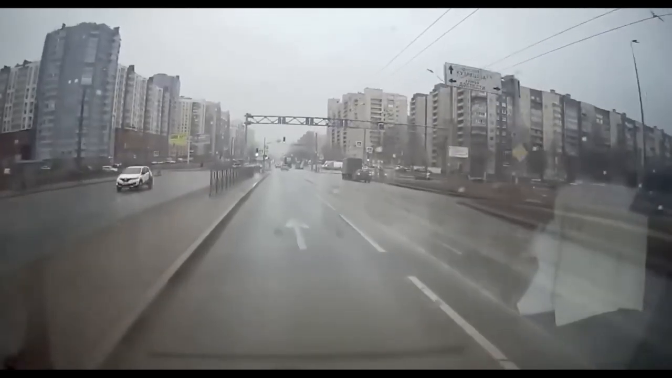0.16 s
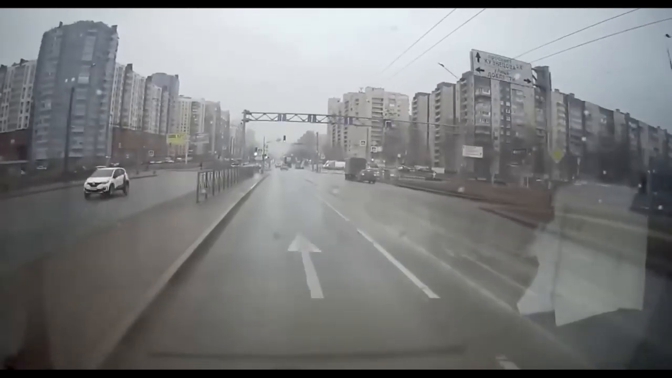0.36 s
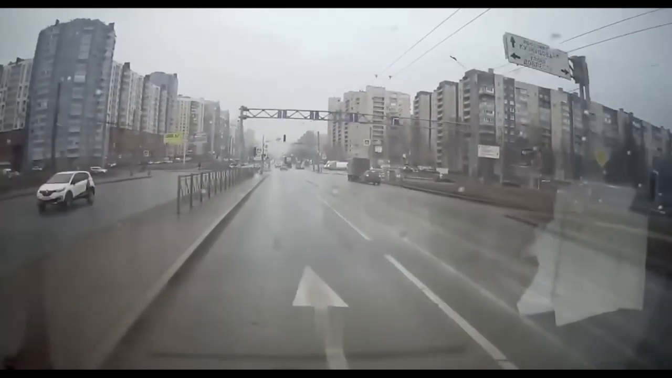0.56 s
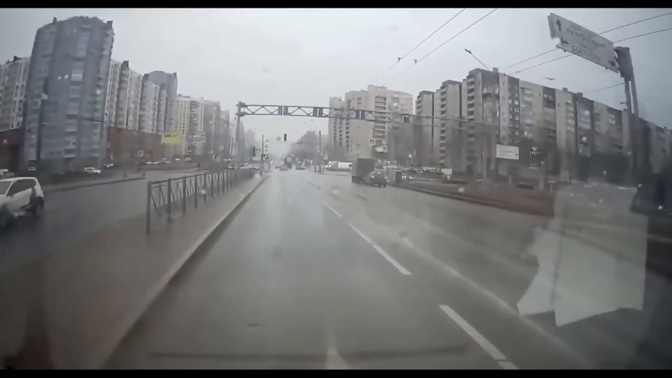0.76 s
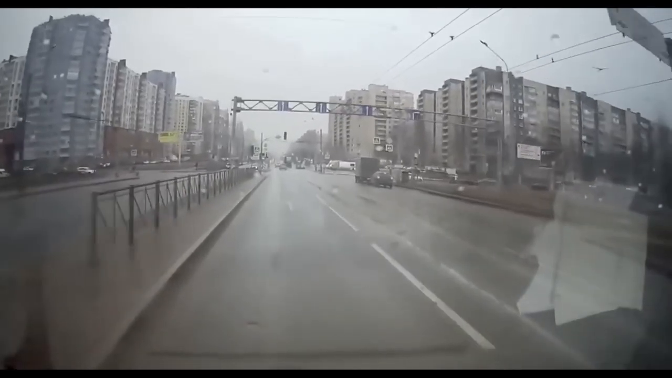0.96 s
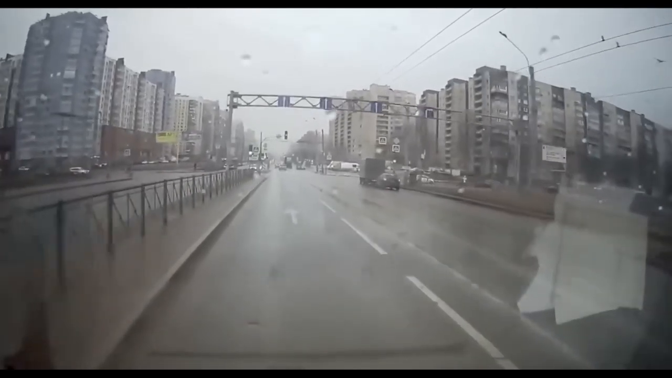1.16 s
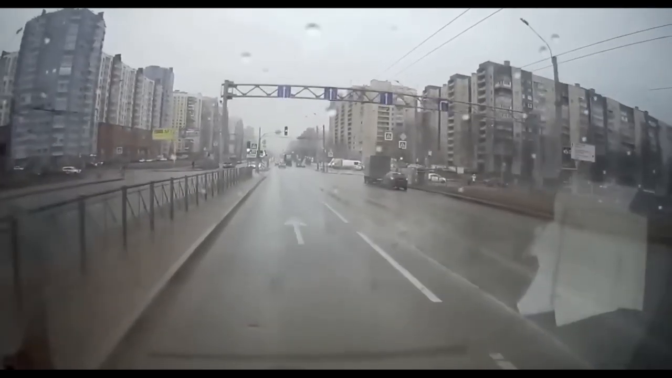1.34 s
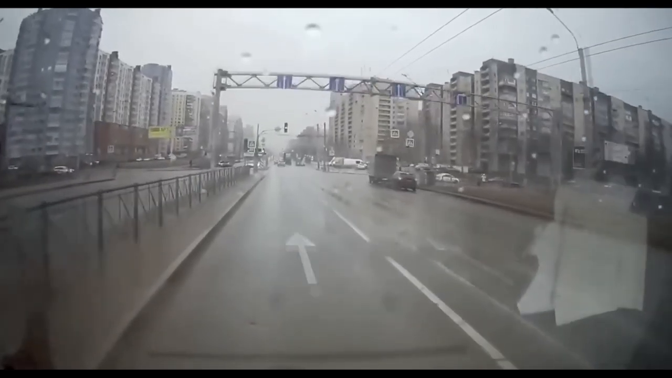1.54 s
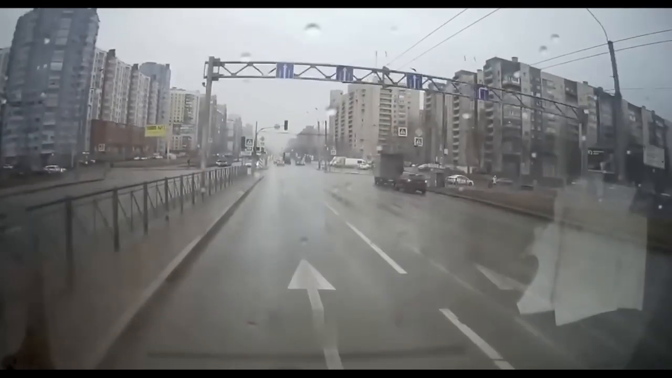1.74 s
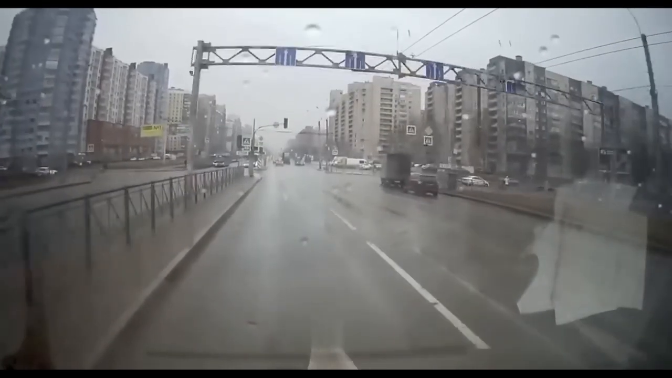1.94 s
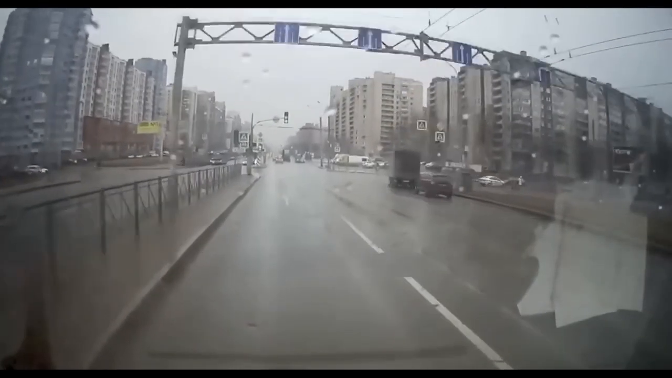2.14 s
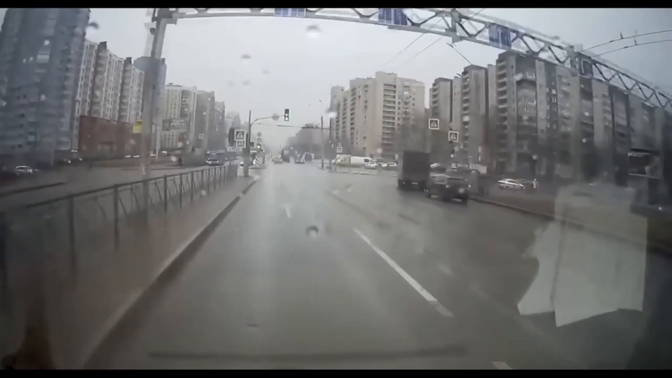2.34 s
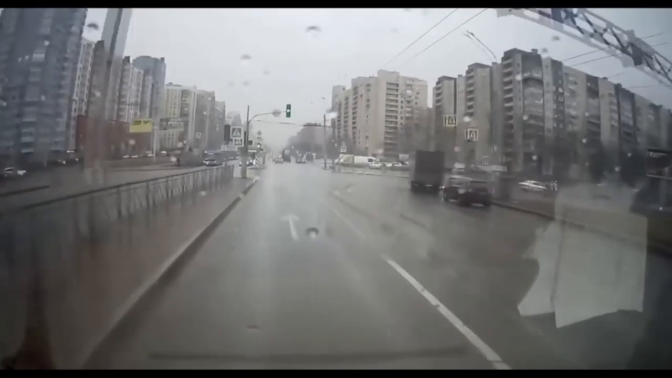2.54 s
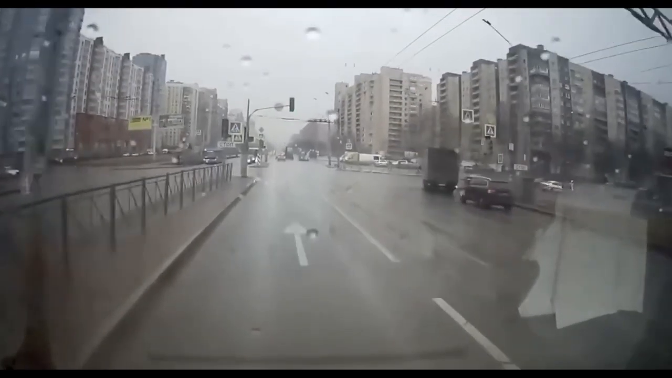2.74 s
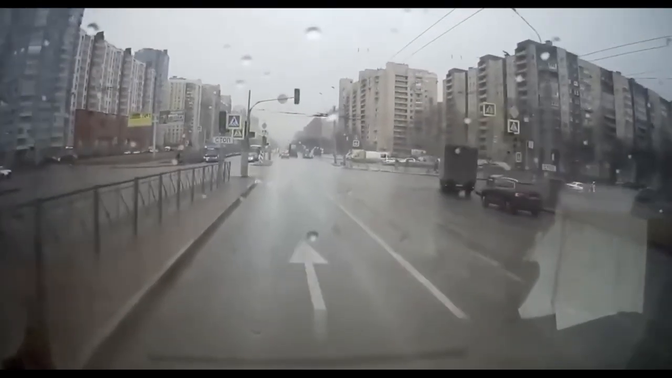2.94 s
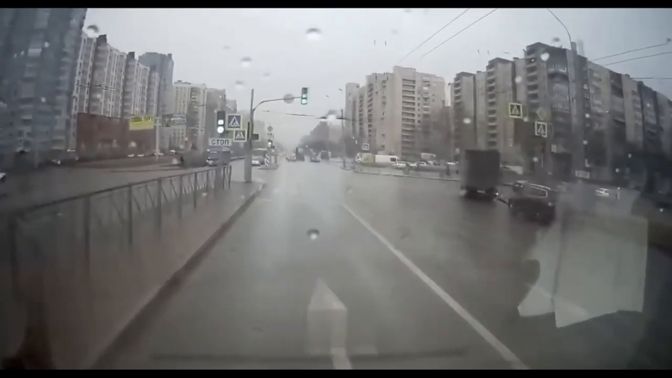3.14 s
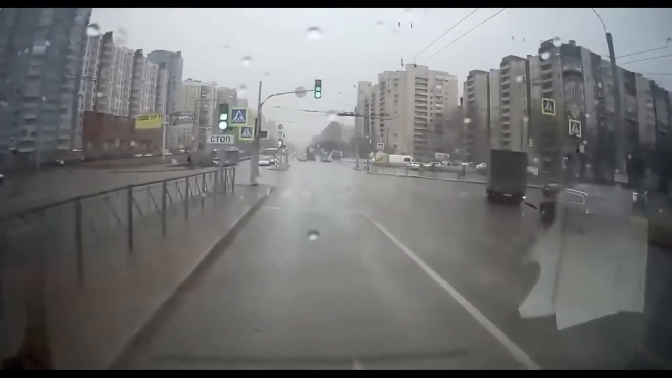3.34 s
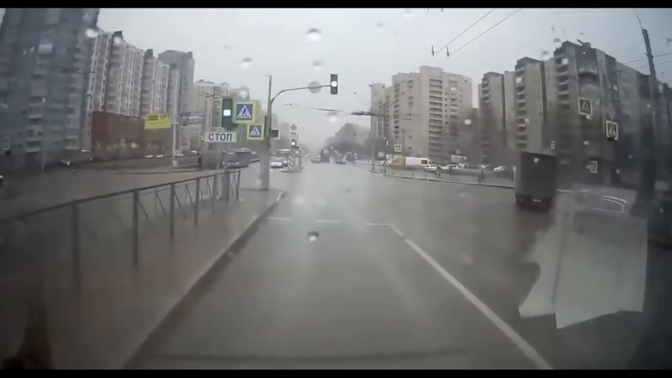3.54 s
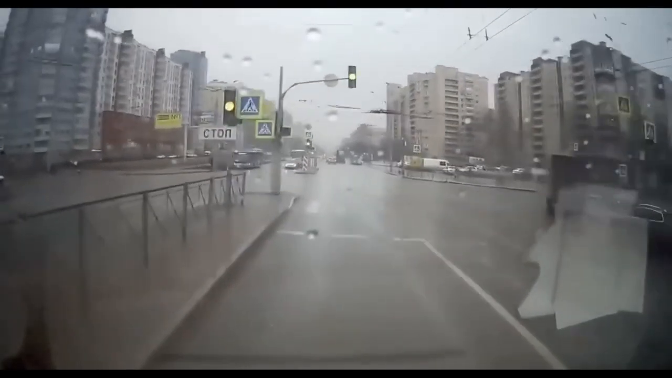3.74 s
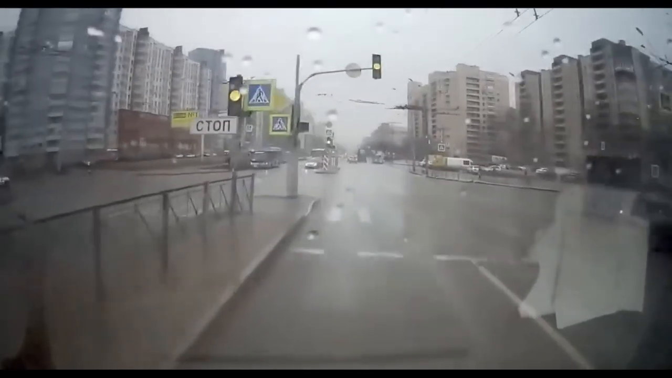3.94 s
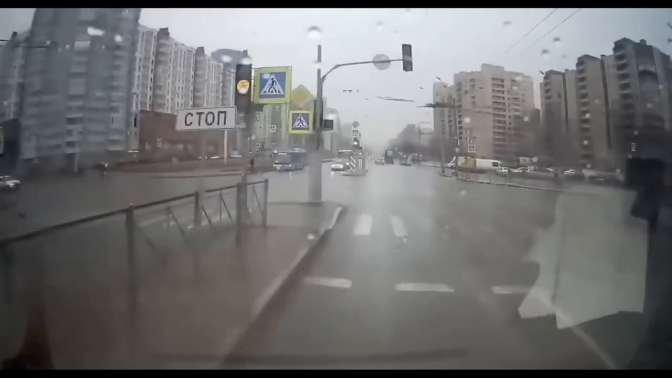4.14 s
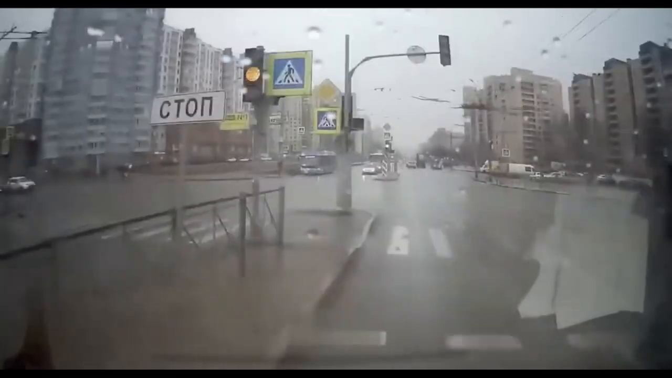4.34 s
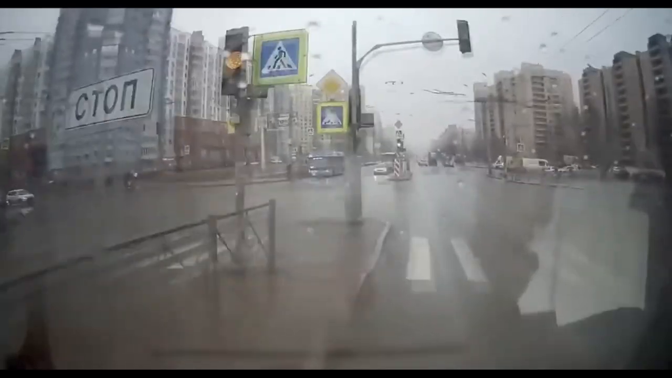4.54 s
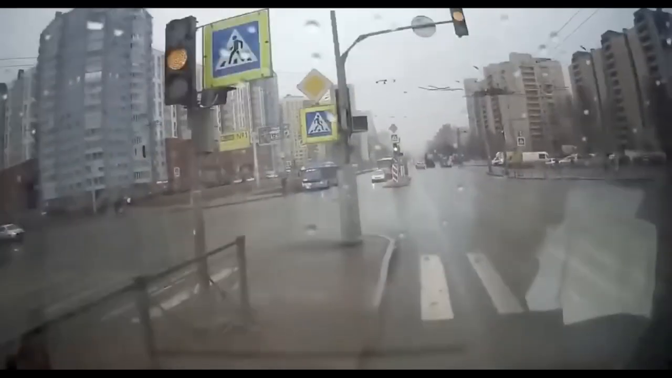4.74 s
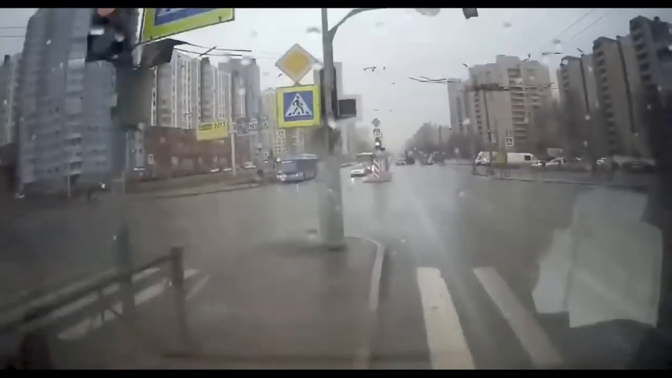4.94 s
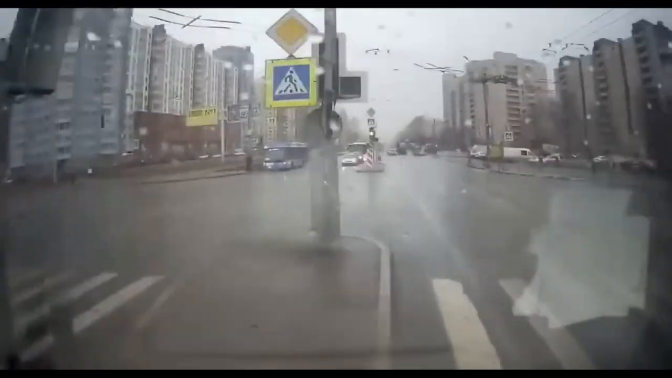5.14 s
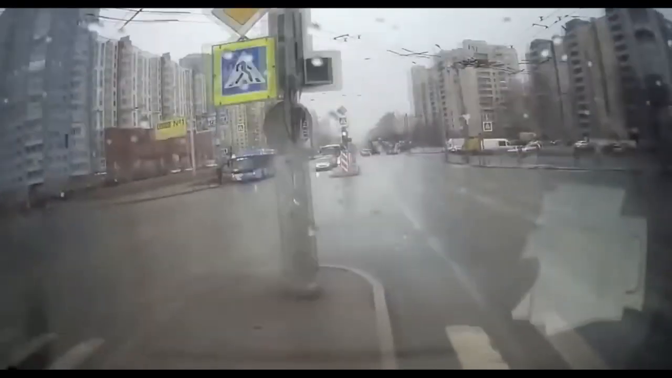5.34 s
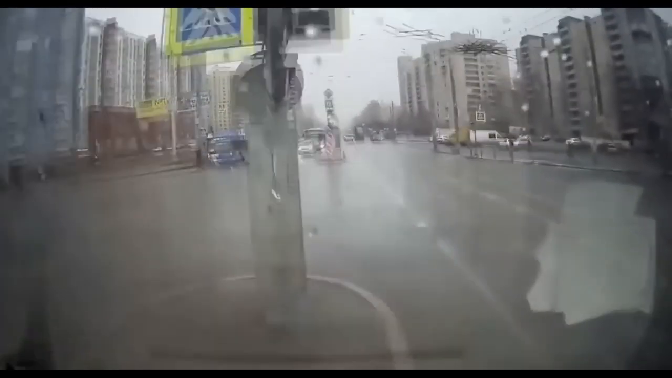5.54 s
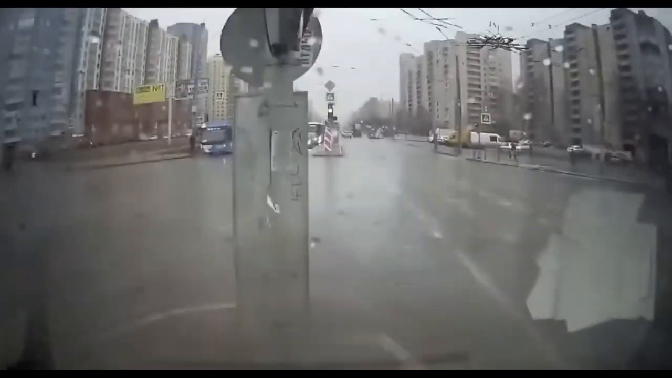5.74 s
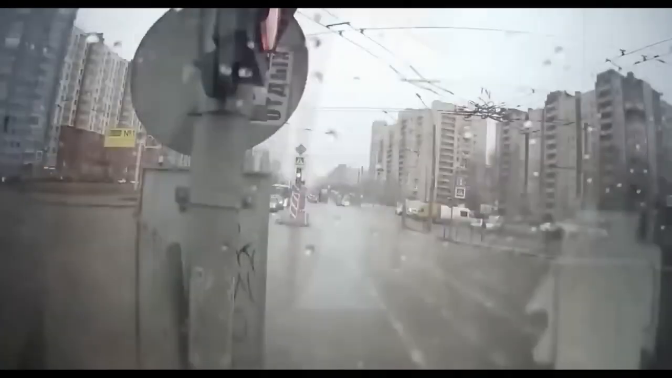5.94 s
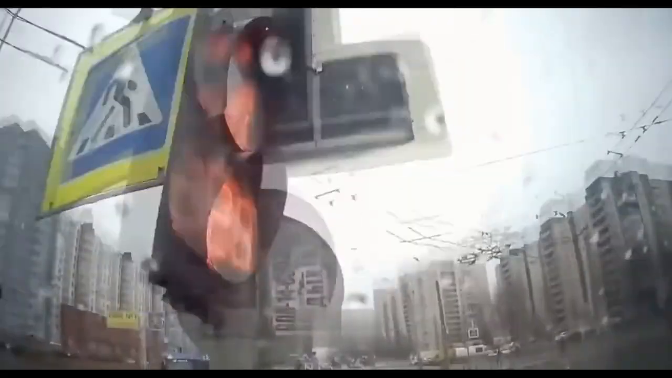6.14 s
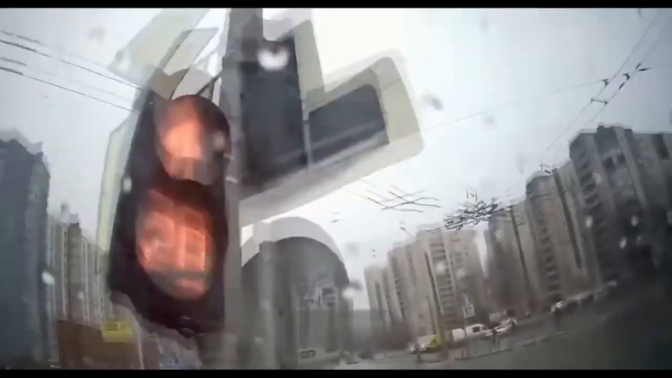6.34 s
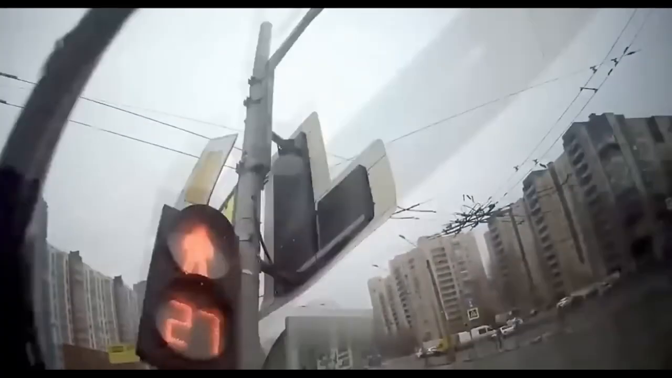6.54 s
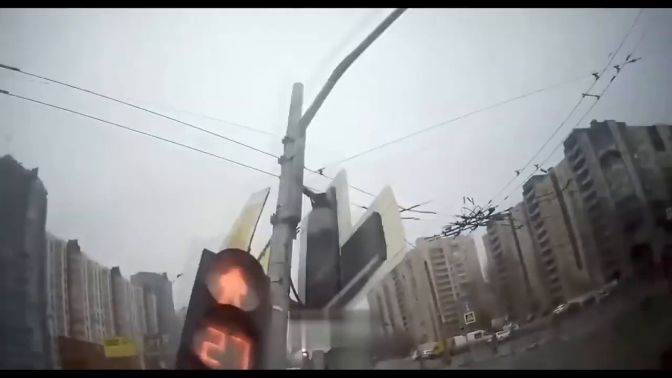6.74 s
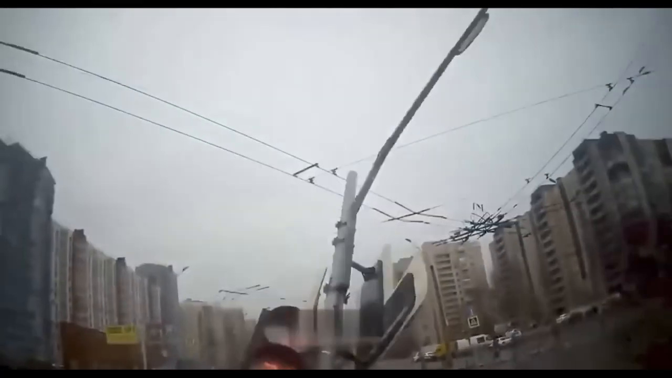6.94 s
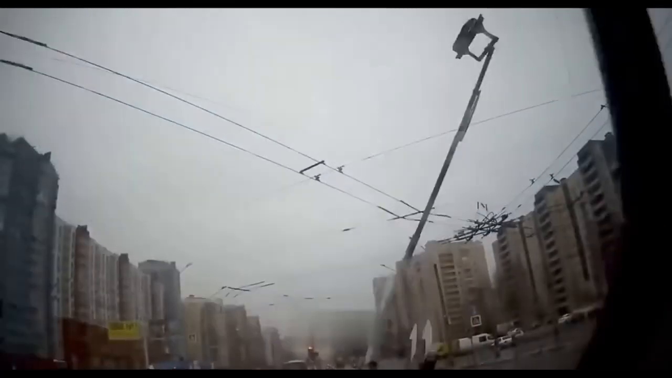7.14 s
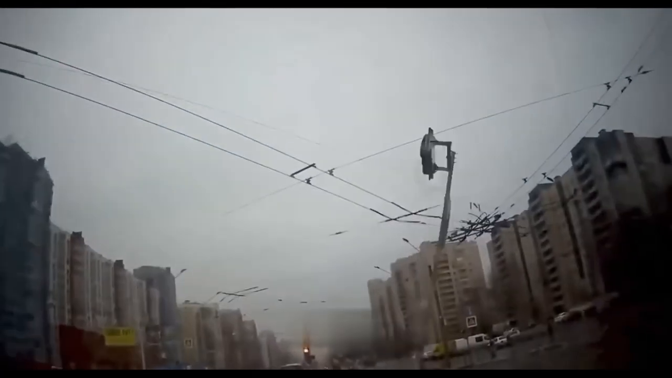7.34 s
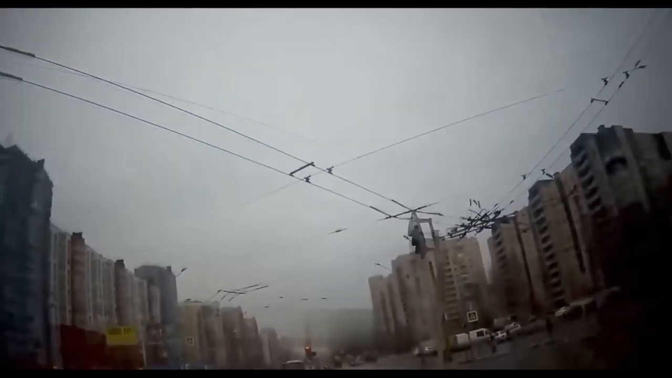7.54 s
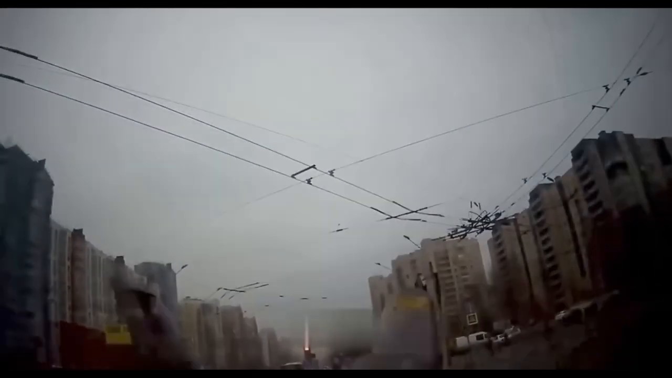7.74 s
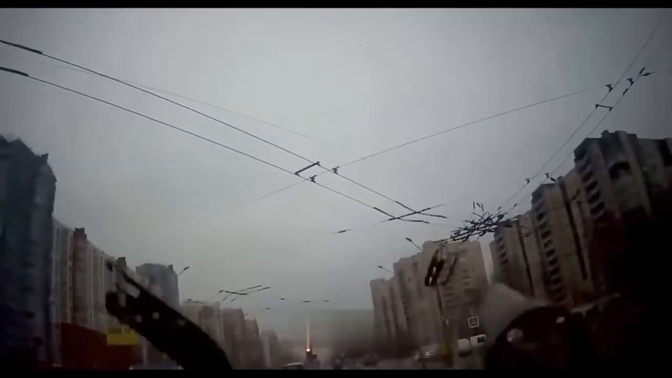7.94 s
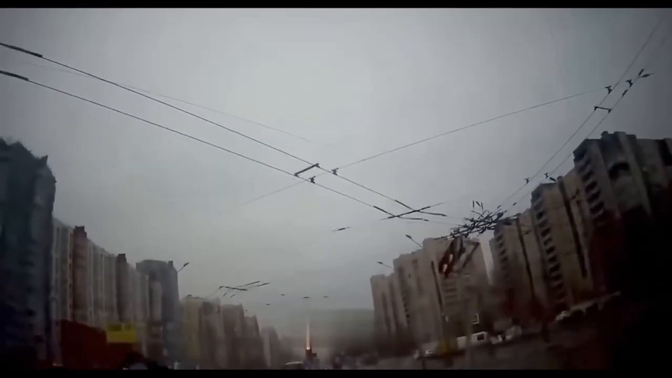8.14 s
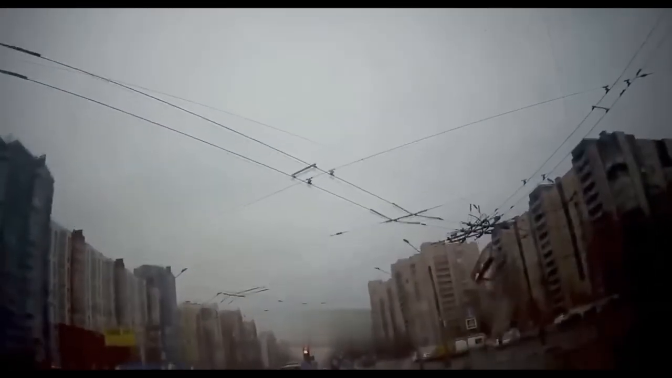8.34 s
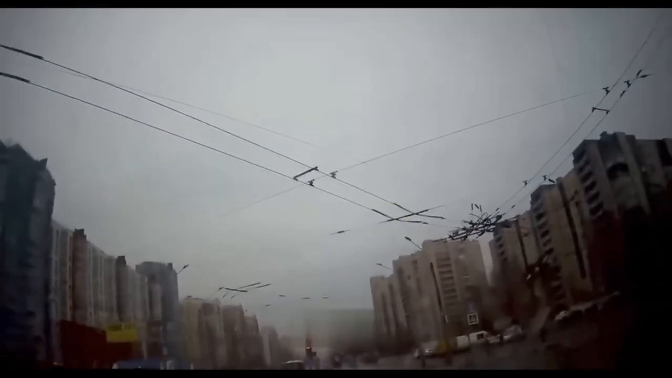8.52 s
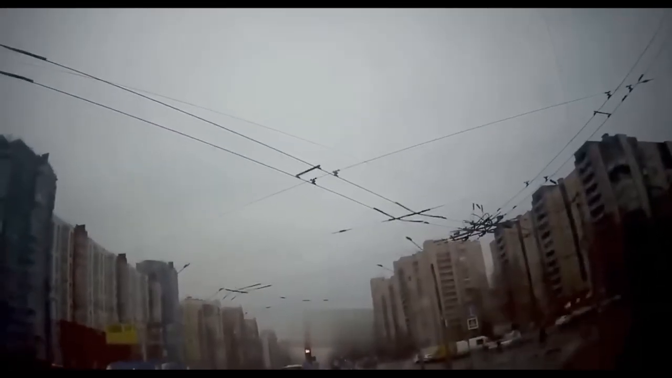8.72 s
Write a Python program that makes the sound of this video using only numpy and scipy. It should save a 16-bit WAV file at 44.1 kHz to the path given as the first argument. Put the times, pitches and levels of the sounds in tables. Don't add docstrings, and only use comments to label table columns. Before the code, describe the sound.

Heard from a small microphone on a car's windscreen: steady low engine drone, dull tyre roar and faint water spray with light trim rattles. The car brakes, the tyres scrub and the body heaves. It bangs over a kerb with heavy thuds and clattering knocks, pauses briefly, then smashes into a steel pole in a dense, clipped crash of buckling metal and glass. Debris clatters down, a pole rings, fluid hisses faintly.

```python
import sys
import numpy as np
from scipy import signal
from scipy.fft import rfft, irfft
from scipy.io import wavfile
from scipy.ndimage import uniform_filter1d

SR = 44100
rng = np.random.default_rng(int(sys.argv[2]) if len(sys.argv) > 2 else 0)


def voltage_ratio(decibels):
    exponent = np.asarray(decibels, float) / 20
    return 10 ** exponent


def bounce(signal):
    frames = np.transpose(np.atleast_2d(signal))
    limited = np.clip(frames, -1, 1)
    pcm = np.round(limited * 32767).astype(np.int16)
    wavfile.write(sys.argv[1], SR, pcm)


N = 387198

# multiple_of_firing_rate, level_db
ENGINE_ORDERS = [(1, 0), (1.25, -20), (2, -15), (3, -16), (4.25, -22), (4.5, -24), (5.5, -26)]
# time_s, firing_rate_hz
FIRING = [(0, 65.4), (1, 65), (2.2, 64.7), (3, 65.8), (3.35, 65), (3.75, 58), (4.1, 49), (4.6, 47.2),
          (5, 45.7), (5.5, 44)]
# time_s, level_db
ENGINE_LOAD = [(0, -32), (.5, -30), (2.2, -28.5), (2.95, -27), (3.1, -34), (3.8, -38), (4.05, -28),
               (4.4, -29), (4.65, -33), (5, -28.5), (5.5, -30)]
# time_s, pitch_hz, level_db
SHAFT_DRONE = [(0, 164.3, -39), (.6, 163.6, -35), (1.4, 162.7, -34), (2.2, 161.8, -36), (3, 164.4, -39),
               (3.4, 162, -35), (3.8, 164, -43)]
# time_s, pitch_hz, level_db
TYRE_DRONE = [(0, 137, -44), (.6, 137.5, -40), (1.8, 137, -39), (2.6, 135.5, -38), (3.4, 138.7, -40)]
# pitch_hz, level_db
WHINES = [(4872, -85.5), (6099, -90)]
# time_s, tyre_roar_db, body_heave_db
ROAD = [(0, -41, -30), (.3, -42, -25.5), (.9, -41, -29), (1.45, -41.5, -24), (2.3, -40, -27.5),
        (2.7, -41, -28), (3.44, -40.5, -20), (3.72, -43, -32), (3.9, -39, -13), (4.3, -40.5, -29.5),
        (4.65, -41.5, -16.5), (5.45, -42.5, -25)]
BRAKES_S = 3.74
ROAR_DB, HEAVE_DB = 0, 0.5
BOOM_DB, BOOM_FOLLOWS, BOOM_BRAKING_DB = -34.5, 0.22, -1
SPRAY_DB, SPRAY_FOLLOWS = -57.5, 0.45
SPLASH_DB, SPLASH_FADE_S = 6, 1

# frequency_hz, density_db
HEAVE = [(8, -5), (15, 1), (22, 1), (30, 3), (45, -1), (60, -35)]
# frequency_hz, density_db
BOOM = [(35, -25.5), (60, 0.5), (77, -11.5), (97, -8.5), (177, -11), (237, -17.5), (280, -20), (360, -52.5),
        (620, -120)]
# frequency_hz, density_db
ROAR = [(140, -31.5), (230, -18.5), (279, 3.5), (319, -2.5), (364, 0.5), (761, -7), (1150, -13),
        (1700, -28.5), (2210, -64.5), (3740, -120)]
# frequency_hz, density_db
SKID = [(140, -24), (230, -8.5), (270, -12), (355, -8), (476, -12), (644, -12.5), (885, -11.5), (1700, -30),
        (2210, -32), (3740, -120)]
# frequency_hz, density_db
SPRAY = [(880, -29), (1500, -2.5), (1580, -23), (1710, -3), (1910, -2), (2200, 3), (2660, 1), (2860, -5),
         (3610, -6), (3830, -5), (4650, -18.5), (5540, -15.5), (7090, -19.5), (7570, -19.5), (8500, -29.5),
         (11000, -66), (18700, -120)]
# frequency_hz, density_db
CRUNCH = [(140, -29), (230, -4), (291, -2.5), (386, -1.5), (587, -4), (712, -8.5), (1020, -6.5),
          (1550, -23.5), (1700, -29.5), (2210, -55), (3740, -120)]
# frequency_hz, density_db
DEBRIS = [(880, -1.5), (1500, -3.5), (1860, -4), (2250, 0.5), (2530, 0.5), (3190, -9.5), (3800, -4.5),
          (4230, -14), (4970, -17.5), (5870, -17.5), (7350, -21.5), (7570, -23.5), (8020, -23), (8500, -32),
          (11000, -76.5), (18700, -120)]
SPLIT_HZ = 3200

# start_s, middle_peak_db, low_part_db, brightness_db
RATTLES = [(0.8001, -39, -40, -7), (1.9834, -35, -42, -2.5), (2.0073, -42, -28, -2), (2.022, -53, -45, 9),
           (2.082, -43, -44, 0), (2.1034, -52, -27.5, 3), (2.175, -49, -49, 9), (2.2324, -30.5, -22, -3),
           (2.2947, -35, -23.5, 2), (2.3266, -42, -51, 0), (2.376, -44, -47, 8), (2.8643, -42, -28, -4),
           (3.2225, -38, -27.5, -2), (3.9697, -31, -43.5, -28), (5.1806, -30, -18, -8)]
# start_s, middle_peak_db, low_part_db, brightness_db
KNOCKS = [(5.4364, -53, -27, 1), (5.4824, -27.5, -39, -1), (5.52, -45, -24, -7), (5.564, -28.5, -26.5, -3),
          (5.585, -33, -41, -6.5), (5.6286, -28, -19.5, -3), (5.679, -50, -24, -9), (5.71, -35, -17.5, 1),
          (5.745, -45, -22.5, 0), (5.7794, -28, -17, 0.5), (5.829, -28, -28, -8), (5.86, -30, -21, -5),
          (5.885, -32, -36, 0), (5.9493, -30.5, -22.5, -7), (5.996, -35.5, -20, -1),
          (6.0174, -37, -17.5, -6), (6.033, -14, -19.5, -7.5), (6.068, -20, -39, -5), (6.09, -34, -38, -3),
          (6.122, -27, -14.5, 2), (6.1525, -32, -17, -7), (6.178, -37, -28, -19), (6.1953, -34.5, -26, -14),
          (6.222, -35, -31, -13), (6.29, -37, -32, -2), (6.3514, -52, -31, 3), (6.3954, -40, -25.5, -3),
          (6.414, -44, -30, -7), (6.44, -30, -27, -7), (6.4744, -25, -20.5, 0), (6.491, -20, -10, -4),
          (6.6727, -32, -52, -6), (6.7945, -17, -9.5, -8), (6.8444, -20.5, -28, -5)]
# start_s, middle_peak_db, low_part_db, brightness_db
SMASHES = [(6.961, -9.5, -1, -8), (6.977, 1, 3, -5.5), (7.0033, -9.5, -12, 17), (7.0125, -8, -20, 10.5),
           (7.0524, -14, 3.5, -13), (7.068, -9.5, -3, -6.5), (7.089, -11.5, -8.5, -5.5),
           (7.1034, 3, 2.5, 0.5), (7.112, -10, -6, 1.5), (7.1363, -4.5, -10, 2.5), (7.149, -7.5, -8, -1.5),
           (7.162, -10, -13.5, 3.5), (7.185, -4, -10, -3), (7.2225, -4, -17.5, 5), (7.238, -11, -12, -1),
           (7.273, -5.5, -12, -9), (7.283, -13, -14, -8), (7.292, -21.5, -13, -5), (7.3, -24.5, -20.5, 1),
           (7.366, -23, -19.5, -11), (7.3776, -13, -32, -7)]
# start_s, middle_peak_db, low_part_db, brightness_db
FALLS = [(7.4514, -27, -13, 10), (7.5164, -32.5, -36, 14), (7.5752, -38, -23, 22), (7.673, -14, -15, -3),
         (7.7538, -49, -42, 0), (7.839, -51, -15.5, 5), (7.9494, -30, -22, 7.5), (7.97, -44, -23, 1),
         (8.2222, -14.5, -17.5, -8.5), (8.279, -52, -49, -8), (8.309, -37, -31, -2),
         (8.3629, -28.5, -41, -6), (8.3878, -18.5, -23, -22), (8.4262, -19, -14.5, 0.5),
         (8.7004, -57, -40, 3), (8.746, -27, -33, -8)]
RATTLE_T60_S, KNOCK_T60_S, SMASH_T60_S, FALL_T60_S = 0.08, 0.079, 0.049, 0.058
# start_s, peak_db, pitch_hz
THUDS = [
    (1.992, -20.5, 109),
    (4.91, -23, 183),
    (5.48, -14.5, 50),
    (5.585, -14.5, 52.6),
    (5.722, -12, 45),
    (6.043, -20.5, 45),
    (6.486, -12, 205),
    (8.362, -21, 168.5),
]
# start_s, peak_db, pitch_hz, t60_s, direction
JOLTS = [(2.146, -13.0, 15.0, 0.5, 1), (3.94, -12.0, 16.0, 0.6, -1), (4.553, -13.0, 20.0, 0.5, 1),
         (5.211, -9.8, 15.6, 1.63, -1), (5.507, -9.1, 33.0, 0.6, 1), (5.549, -10.3, 14.4, 2.54, -1),
         (5.66, -11.2, 19.6, 0.37, 1), (5.766, -14.1, 23.4, 1.24, 1), (5.891, -21.9, 26.2, 1.03, 1),
         (6.023, -2.5, 30.7, 0.54, -1), (6.066, -3.1, 38.3, 0.18, 1), (6.134, -15.0, 16.4, 3.59, 1),
         (6.19, -9.8, 21.8, 1.05, 1), (6.272, -18.8, 26.3, 1.2, 1), (6.503, -14.9, 22.9, 0.72, 1),
         (6.751, -10.3, 20.4, 0.76, 1), (6.872, -11.6, 17.7, 1.13, 1), (6.958, 1.0, 31.0, 0.11, 1),
         (7.006, 0.1, 14.0, 0.58, -1), (7.032, 5.2, 23.0, 0.18, 1), (7.054, 2.8, 31.8, 0.36, -1),
         (7.077, 3.5, 49.6, 0.3, -1), (7.098, 5.1, 42.1, 0.07, 1), (7.141, 6.4, 26.2, 0.05, -1),
         (7.171, 3.3, 25.7, 0.13, 1), (7.211, 3.0, 35.3, 0.26, -1), (7.257, 3.9, 24.0, 0.26, 1),
         (7.272, -6.9, 12.9, 0.8, -1), (7.323, -1.1, 23.8, 0.76, 1), (7.348, -4.1, 20.0, 0.18, -1),
         (7.371, -9.6, 25.7, 1.0, -1), (7.46, -15.9, 34.6, 0.53, 1), (7.546, -11.2, 54.5, 0.22, 1),
         (7.581, -6.7, 18.3, 0.54, 1), (7.663, -7.4, 28.3, 0.35, -1), (7.72, -12.9, 31.4, 1.01, 1),
         (7.983, -13.3, 30.3, 1.33, 1), (8.347, -9.9, 34.2, 0.14, 1), (8.435, -13.4, 24.0, 0.35, 1),
         (8.611, -20.4, 32.5, 1.93, 1)]
# time_s, pitch_hz, level_db
DASH_DRONE = [(2.55, 367.1, -72), (2.56, 366.3, -45.5), (2.962, 365.6, -40.5), (3.05, 378.0, -58.5)]
# time_s, pitch_hz, level_db
FLOOR_DRONE = [(3.15, 197.4, -41), (3.36, 188.4, -34), (3.498, 197, -44), (3.5, 187.9, -45)]
# start_s, force_db, length_s, debris_over_crunch_db, glass_over_debris_db
BLOWS = [(5.446, -30.5, 1, -10, 1.5), (6.002, -28, 0.2, -8, -2), (6.38, -39.5, 0.065, -7, 8.5),
         (6.455, -26, 0.075, -6.5, 0), (6.645, -39.5, 0.27, -10, 4.5), (6.731, -25.5, 0.15, -12, 1),
         (6.947, -7, 0.051, -9, -13), (7.026, -11.5, 0.26, -10.5, 3.5), (7.28, -20, 0.086, -10, -1),
         (7.398, -29, 0.16, -7.5, 3), (7.526, -24.5, 0.011, -7.5, 9.5), (7.63, -28.5, 0.069, -12, 8.5),
         (7.747, -34.5, 0.25, -8.5, 5), (7.926, -36.5, 0.18, -11, 6.5), (8.17, -35, 0.0092, -8.5, -3),
         (8.334, -29.5, 0.11, -8, -15), (8.442, -31.5, 0.079, -12, -12), (8.548, -46.5, 0.066, 9, -11),
         (8.747, -30.5, .05, -7.5, -9)]
ATTACK_S, SAG_DB_PER_S, RELEASE_DB_PER_S = 0.04, 22, 121.5
REST_DB, REST_DEBRIS_DB, REST_GLASS_DB = -41.5, -52.5, -1.5
LULL_S, LULL_WIDTH_S, LULL_DB = 6.32, .055, -7
SHELL_DB, SHELL_FOLLOWS = -33, 0.83
SWAY_DB = 15
SWAY_YIELDS, SWAY_KEPT = .3, .25
# start_s, boom_db, length_s
SLAMS = [
    (5.518, -21.5, 0.31),
    (5.972, -16, 0.27),
    (6.776, -26.5, 0.21),
    (6.958, -4, 0.07),
    (7.05, -9.5, 0.16),
    (7.267, -11.5, 0.075),
    (7.467, -21.5, 0.078),
    (8.298, -33, 0.12),
]
# start_s, peak_db, pitch_hz, t60_s
CLANGS = [(6.034, -23, 1046, 0.08), (6.152, -18.5, 611, 0.068), (5.585, -37, 2490, .06),
          (5.63, -34, 2770, 0.057), (6.2, -30, 2340, 0.067), (6.223, -36, 2650, .05),
          (6.492, -24, 472, 0.14), (6.495, -17.5, 1014, 0.073), (6.961, -11.5, 520, 0.25),
          (6.976, -8, 796, 0.2), (6.987, -6, 1170, 0.14), (7.182, -8.5, 994, 0.25),
          (7.188, -9.5, 385, 0.24), (7.202, -22, 1677, 0.097), (7.303, -16, 419, .12),
          (5.997, -40, 3900, 0.069), (8.372, -33, 2200, .2), (8.373, -33, 1023, .15), (8.39, -32, 850, .1),
          (8.427, -32, 4500, 0.034), (8.47, -28, 526, .3), (8.49, -30, 744, 0.43), (7.54, -24.5, 406, 0.18),
          (7.55, -22.5, 580, 0.23), (7.585, -26, 990, .1), (7.676, -29.5, 300, 0.078),
          (7.678, -27.5, 614, 0.071), (6.8, -33, 3600, .06), (6.545, -35, 4230, .05)]
# time_s, level_db
SHATTER = [(6.958, -50), (6.98, -25), (7.005, -19), (7.02, -31), (7.1, -33), (7.165, -35), (7.25, -38),
           (7.35, -50)]
# time_s, level_db
FLUID_LEAK = [(7.38, -60), (7.56, -51), (7.66, -56), (7.8, -55), (7.96, -50), (8.08, -55), (8.2, -63)]
FLUID_HZ, FLUID_WIDTH_HZ = 3790, 330
POLE_S = 7.839
# pitch_hz, level_db, t60_s
POLE = [(300, 1, 1.2), (495, -2.5, 0.81), (565, -16, 0.15), (820, -15, 1.1)]

TOP, OFFSET = .425, .012
EDGE_HZ, LEAK_DB, HISS_DB = 7460, -7.5, -93.5
FUZZ_DB, FUZZ_HZ = -9, 2500
# time_s, lowest_lost_hz
DROPOUTS = [(.635, 4000), (.94, 3800), (1.34, 4200), (1.67, 4000), (1.71, 4300), (3.25, 4200), (1.79, 4200),
            (2.045, 4300), (2.365, 3000), (3.46, 4200), (4.25, 4300), (4.4, 4500), (5.685, 3300),
            (6.25, 4300), (6.385, 4400), (6.52, 4700), (6.6, 4500), (6.63, 4300), (6.655, 4300),
            (6.695, 3000), (6.778, 3300), (6.797, 4300), (7.55, 4300), (7.72, 4200), (8.15, 4300),
            (8.187, 4200), (8.765, 2800)]


def rms_one(x):
    return x / np.sqrt(np.mean(x ** 2) + 1e-20)


def in_time(rows, fade_s=0.023):
    s, *columns = np.transpose(rows)
    t = np.arange(N) / SR
    gate = np.clip(np.minimum(t - s[0], s[-1] - t) / fade_s + 1, 0, 1)
    return [np.interp(t, s, c) for c in columns] + [gate]


def drift(rate):
    r = np.exp(-80 * np.pi * rate / SR)
    slow = signal.lfilter([1], [1, -2 * r, r * r], rng.standard_normal(N // 40 + 2002))[2000:]
    return np.interp(np.arange(N) / 40, np.arange(len(slow)), rms_one(slow))


def coloured(x, spectrum):
    hz, db = np.transpose(spectrum)
    f = np.maximum(np.fft.rfftfreq(N, 1 / SR), 1)
    outside = np.log2(np.maximum(hz[0] / f, 1) * np.maximum(f / hz[-1], 1))
    gain_db = np.interp(np.log(f), np.log(hz), db) - 60 * outside
    return rms_one(irfft(rfft(x) * voltage_ratio(gain_db), N))


def patchy(spectrum, patchy_db, rate, count=4):
    x, shared = coloured(rng.standard_normal(N), spectrum), drift(rate)
    edges = np.geomspace(spectrum[0][0], spectrum[-1][0], count + 1)[1:-1]
    lows = [signal.sosfiltfilt(signal.butter(2, e, fs=SR, output="sos"), x) for e in edges]
    lows = [0 * x] + lows + [x]
    out = 0
    for below, upto in zip(lows, lows[1:]):
        out = out + (upto - below) * voltage_ratio(patchy_db * (shared + 0.96 * drift(rate)))
    return rms_one(out)


def halves(x):
    low = signal.sosfiltfilt(signal.butter(4, SPLIT_HZ, fs=SR, output="sos"), x)
    return low, x - low


def swing(s, hz, t60):
    t = np.arange(int(1.5 * t60 * SR)) / SR
    out, at = np.zeros(N), round(s * SR)
    out[at:at + len(t)] = (np.sin(2 * np.pi * hz * t) * voltage_ratio(-60 * t / t60))[:N - at]
    return out


def tone(hz, wobble_db):
    phase = 2 * np.pi * np.cumsum(hz) / SR + rng.uniform(0, 6.57)
    return np.sqrt(2) * np.sin(phase) * voltage_ratio(wobble_db * drift(2.5))


def engine():
    firing, gate = in_time(FIRING)
    level_db, _ = in_time(ENGINE_LOAD)
    orders = 0
    for k, db in ENGINE_ORDERS:
        orders = orders + voltage_ratio(db) * tone(k * firing * (1 + .002 * drift(2)), .4 + .5 * k)
    out = gate * voltage_ratio(level_db) * orders
    for rows in SHAFT_DRONE, TYRE_DRONE:
        hz, db, gate = in_time(rows)
        out += gate * voltage_ratio(db - 2.2) * tone(hz, wobble_db=1.2)
    return out + sum(voltage_ratio(db) * tone(np.full(N, hz), wobble_db=.5) for hz, db in WHINES)


def heaving(rate):
    return rms_one(np.tanh(0.29 * patchy(HEAVE, patchy_db=2.0, rate=rate)))


def rolling():
    load_db, rough_db, gate = in_time(ROAD)
    since = np.maximum(np.arange(N) / SR - BRAKES_S, 0)
    braking = np.clip(since / 0.069, 0, 1)
    boom_db = BOOM_DB + BOOM_FOLLOWS * (rough_db - rough_db.mean()) + BOOM_BRAKING_DB * np.minimum(since, 1)
    splash_db = SPLASH_DB * np.clip((since - 0.07) / 0.085, 0, 1) * np.exp(-since / SPLASH_FADE_S)
    spray_db = SPRAY_DB + SPRAY_FOLLOWS * (load_db - load_db.mean()) + splash_db
    heave = voltage_ratio(rough_db + HEAVE_DB) * heaving(1.4)
    boom = voltage_ratio(boom_db) * patchy(BOOM, patchy_db=2.0, rate=5.9)
    free = patchy(ROAR, patchy_db=0.85, rate=24.0)
    scrubbing = patchy(SKID, patchy_db=1.4, rate=8.9)
    roar = np.sqrt(1 - braking) * free + np.sqrt(braking) * scrubbing
    spray = voltage_ratio(spray_db) * patchy(SPRAY, patchy_db=0.4, rate=12.0)
    return gate * (heave + boom + voltage_ratio(load_db + ROAR_DB) * roar + spray)


def knocks():
    levels, t = np.zeros((3, N)), np.arange(SR // 5) / SR
    groups = ((RATTLES, RATTLE_T60_S), (KNOCKS, KNOCK_T60_S), (SMASHES, SMASH_T60_S), (FALLS, FALL_T60_S))
    for rows, t60 in groups:
        for s, db, low_db, bright_db in rows:
            at = round(s * SR)
            shape = ((1 - np.exp(-t / 0.00061)) * voltage_ratio(-60 * t / t60))[:N - at]
            peaks_db = np.array([[low_db - 7.0], [db - 12.0], [db - 8.5 + bright_db]])
            levels[:, at:at + len(shape)] += voltage_ratio(peaks_db) * shape
    dull = coloured(rng.standard_normal(N), CRUNCH)
    middle, bright = halves(coloured(rng.standard_normal(N), DEBRIS))
    return np.sum(levels * [dull, middle, bright], axis=0)


def wheel_thuds():
    return sum(voltage_ratio(db) * swing(s, hz, t60=0.16) for s, db, hz in THUDS)


def body_jolts():
    return sum(way * voltage_ratio(db) * swing(s, hz, t60) for s, db, hz, t60, way in JOLTS)


def cabin_drones():
    out = 0
    for rows in DASH_DRONE, FLOOR_DRONE:
        hz, db, gate = in_time(rows)
        out = out + gate * voltage_ratio(db - 4.0) * tone(hz, wobble_db=-0.5)
    return out


def grains(per_s, spread_db, clump_db):
    sizes = voltage_ratio(spread_db * np.minimum(rng.exponential(1, N), 4)) * rng.choice([-1, 1], N)
    born = rng.random(N) < per_s * voltage_ratio(clump_db * drift(25)) / SR
    return rms_one(sizes * born) + 1.15 * rng.standard_normal(N)


def panels(per_s, cycles, count=16):
    clicks = grains(per_s, spread_db=2.0, clump_db=5.5)
    dealt, out = rng.integers(0, count, N), 0
    for k, hz in enumerate(np.geomspace(260, 2600, count) * rng.uniform(.95, 1.05, count)):
        r, w = voltage_ratio(-60 * hz / (cycles * SR)), 2 * np.pi * hz / SR
        ring = signal.lfilter([0, 1], [1, -2 * r * np.cos(w), r * r], clicks * (dealt == k))
        out = out + rms_one(ring) * np.sqrt(hz)
    return rms_one(out)


def spell(s, length):
    since = np.maximum(np.arange(N) / SR - s, 0)
    fall_db = -SAG_DB_PER_S * since - RELEASE_DB_PER_S * np.maximum(since - length, 0)
    return np.minimum(since / ATTACK_S, 1) * voltage_ratio(fall_db)


def spells():
    power = voltage_ratio([[REST_DB], [REST_DEBRIS_DB], [REST_DEBRIS_DB + REST_GLASS_DB]]) ** 2 * np.ones(N)
    power *= voltage_ratio(2 * LULL_DB * np.exp(-((np.arange(N) / SR - LULL_S) / LULL_WIDTH_S) ** 2))
    for s, db, length, debris_db, glass_db in BLOWS:
        peaks = voltage_ratio([[db], [db + debris_db], [db + debris_db + glass_db]])
        power += (peaks * spell(s, length)) ** 2
    return np.sqrt(power)


def crushing(jolts):
    force, lump_gain, shard_gain = spells()
    gate = np.clip((np.arange(N) / SR - ROAD[-1][0]) / 0.052 + 0.93, 0, 1)
    shell = voltage_ratio(SHELL_DB) * (force / voltage_ratio(REST_DB)) ** SHELL_FOLLOWS
    shell = shell + sum(voltage_ratio(db) * spell(s, length) for s, db, length in SLAMS)
    boom = shell * patchy(BOOM, patchy_db=-1.5, rate=11.0)
    tearing = rms_one(grains(per_s=1700, spread_db=-7.0, clump_db=8.0))
    ringing = panels(per_s=500, cycles=22)
    crunch = force * coloured(tearing + 2.5 * ringing, CRUNCH)
    lumps, shards = halves(coloured(grains(per_s=1400, spread_db=2.0, clump_db=10.5), DEBRIS))
    debris = voltage_ratio(-2.5) * (lump_gain * lumps + shard_gain * shards)
    heave = np.minimum(force * voltage_ratio(SWAY_DB), voltage_ratio(-22.5)) * heaving(3.7)
    free = np.clip(1 - uniform_filter1d(abs(jolts), size=3000) / SWAY_YIELDS, SWAY_KEPT, 1)
    return gate * (free * heave + np.sqrt(free) * boom + crunch + debris)


def clangs():
    out = 0
    for s, db, hz, t60 in CLANGS:
        out = out + voltage_ratio(db - 4) * (swing(s, hz, t60) + .6 * swing(s, 1.04 * hz, t60))
    return out


def shattering():
    level_db, gate = in_time(SHATTER)
    clicks = grains(per_s=700, spread_db=5.5, clump_db=8.0)
    return gate * voltage_ratio(level_db) * coloured(clicks, [(2500, -6), (4500, -5), (6500, 0), (8000, -6)])


def fluid_leak():
    level_db, gate = in_time(FLUID_LEAK)
    r, w = np.exp(-np.pi * FLUID_WIDTH_HZ / SR), 2 * np.pi * FLUID_HZ / SR
    whistle = rng.standard_normal(N)
    for _ in range(2):
        whistle = signal.lfilter([1, 0, -1], [1, -2 * r * np.cos(w), r * r], whistle)
    sputter = voltage_ratio(3.0 * drift(12.0))
    return gate * voltage_ratio(level_db) * sputter * rms_one(whistle)


def pole_ring():
    return sum(voltage_ratio(db - 30.0) * swing(POLE_S, hz, t60) for hz, db, t60 in POLE)


def scene():
    jolts = body_jolts()
    car = engine() + rolling() + cabin_drones()
    impacts = knocks() + wheel_thuds() + jolts + clangs() + pole_ring()
    return (car + impacts + crushing(jolts) + shattering() + fluid_leak())[None]


def fuzz(x):
    upper = signal.sosfilt(signal.butter(2, 400, "high", fs=SR, output="sos"), x)
    band = signal.butter(4, [150, FUZZ_HZ], "band", fs=SR, output="sos")
    hiss = signal.sosfilt(band, rng.standard_normal(N))
    return voltage_ratio(FUZZ_DB) * uniform_filter1d(upper ** 2, size=2000) * rms_one(hiss)


def upper_dropouts(x):
    x = np.pad(x, ((0, 0), (0, 1024)), mode="reflect")
    hz, t, frames = signal.stft(x[0], SR, nperseg=1024, boundary="even", padded=False)
    for s, edge_hz in DROPOUTS:
        now = abs(t - s) < .0117
        power = uniform_filter1d(np.mean(abs(frames[:, now]) ** 2, axis=1), size=3)
        strong = power > 1.6 * uniform_filter1d(power, size=61)
        upper = (hz > edge_hz) & (hz < 8300)
        frames[:, now] *= np.where(upper, np.where(strong, 1.4, .14), 1)[:, None]
    return signal.istft(frames, SR, nperseg=1024)[1][None, :N]


def roll_off(x):
    return signal.sosfilt(signal.butter(12, 16510, fs=SR, output="sos"), x)


def record(dry):
    awake = np.minimum(np.arange(N) / (.01 * SR), 1)
    clipped = np.clip(awake * dry, -TOP - OFFSET, TOP - OFFSET)
    kept = signal.sosfilt(signal.butter(10, EDGE_HZ, fs=SR, output="sos"), clipped)
    above = clipped * voltage_ratio(LEAK_DB) + voltage_ratio(HISS_DB) * rng.standard_normal(N)
    leak = signal.sosfilt(signal.butter(6, [8500, 16400], "band", fs=SR, output="sos"), above)
    closing = np.minimum(np.arange(N)[::-1] / (.006 * SR), 1)
    mix = closing * (upper_dropouts(kept + leak + fuzz(kept)) + OFFSET)
    return roll_off(mix)


dry = scene()
out = record(dry)
bounce(out)
```